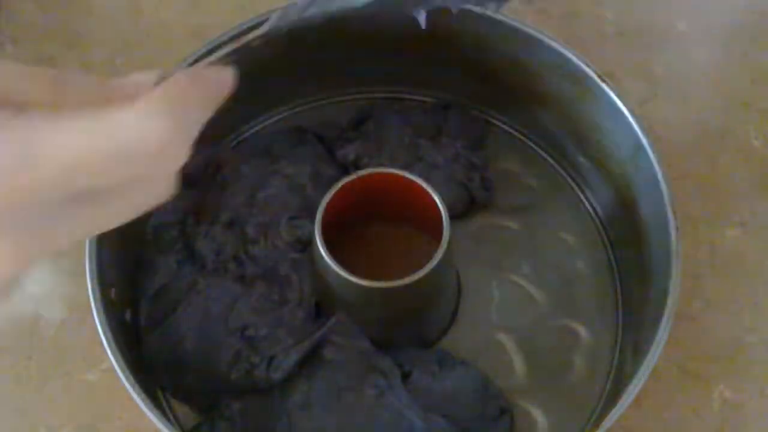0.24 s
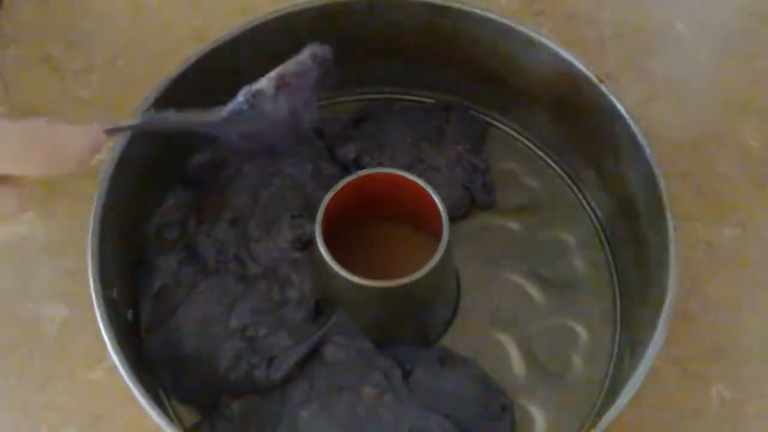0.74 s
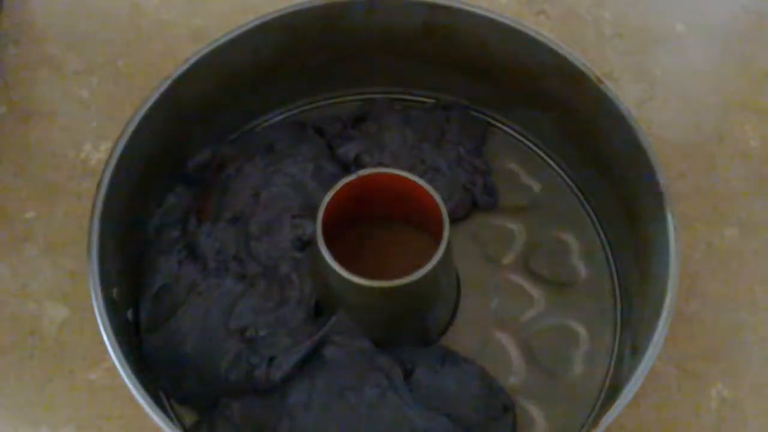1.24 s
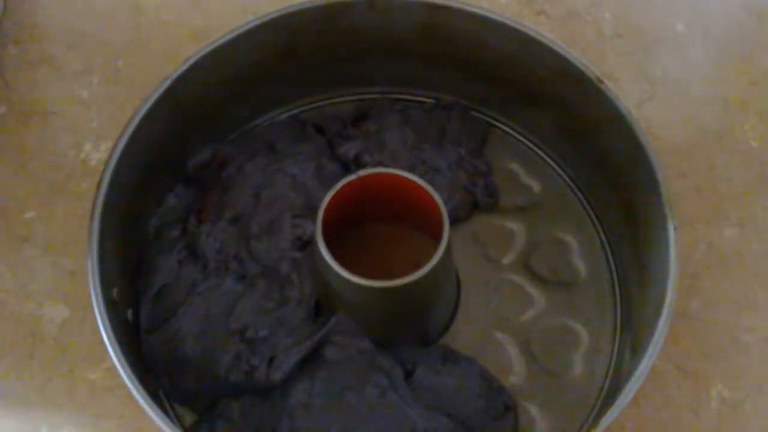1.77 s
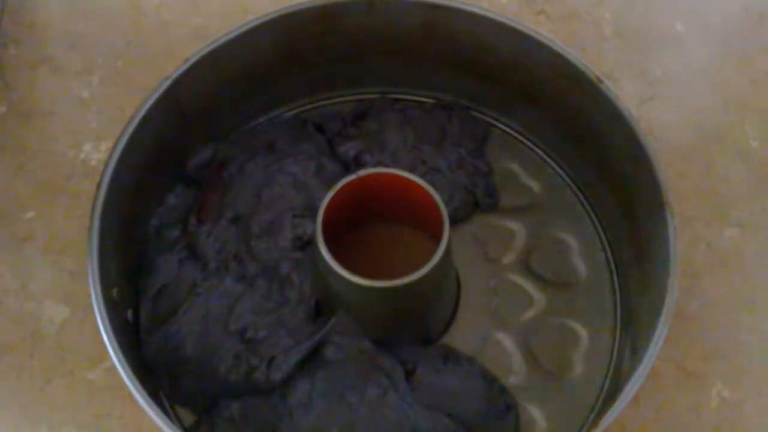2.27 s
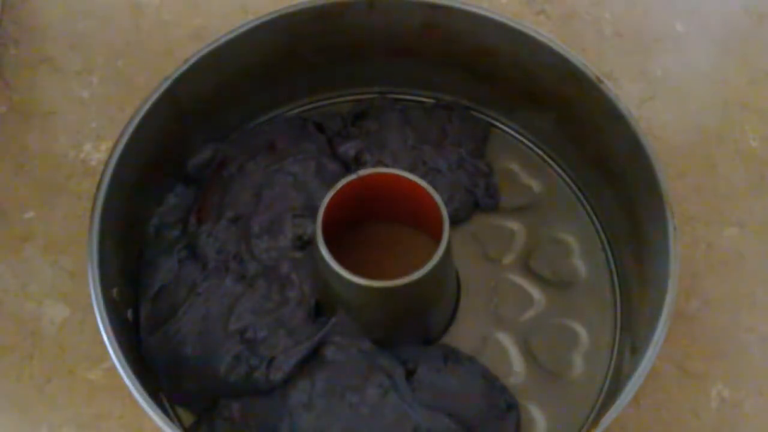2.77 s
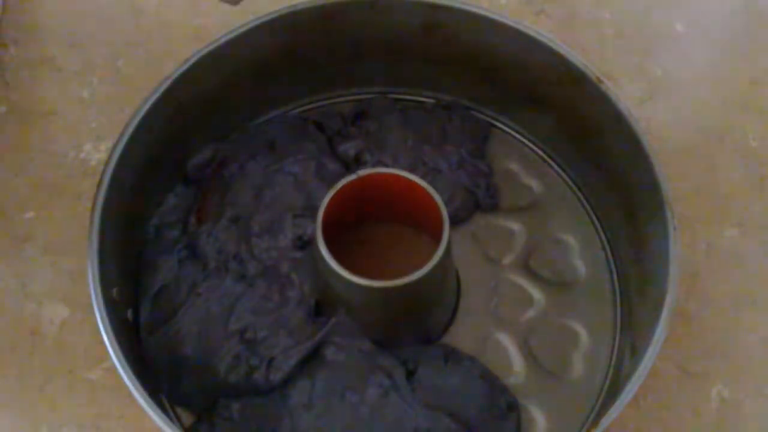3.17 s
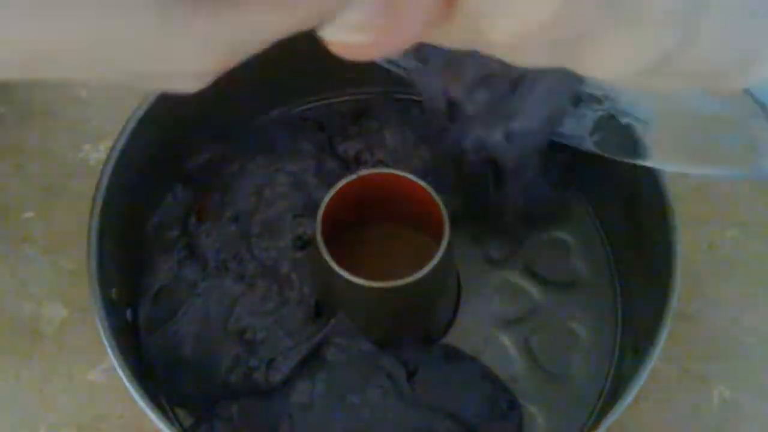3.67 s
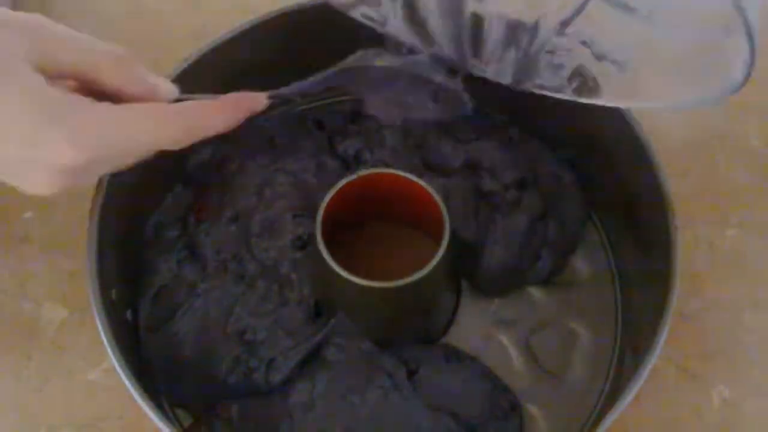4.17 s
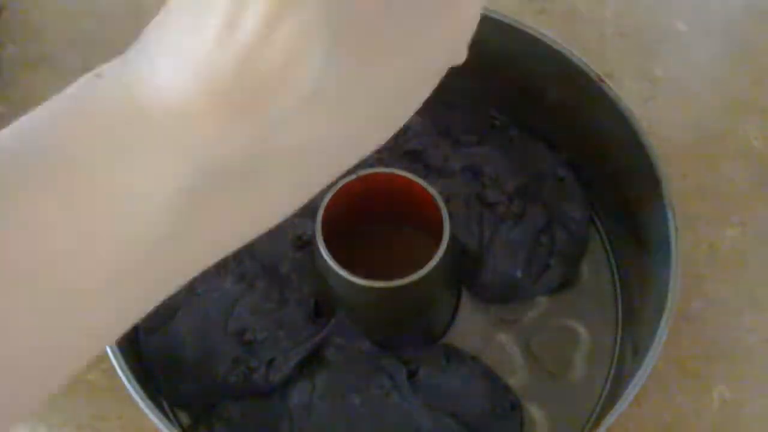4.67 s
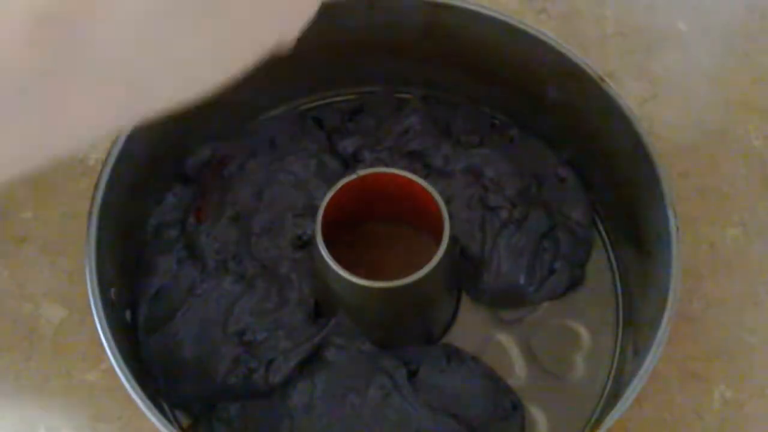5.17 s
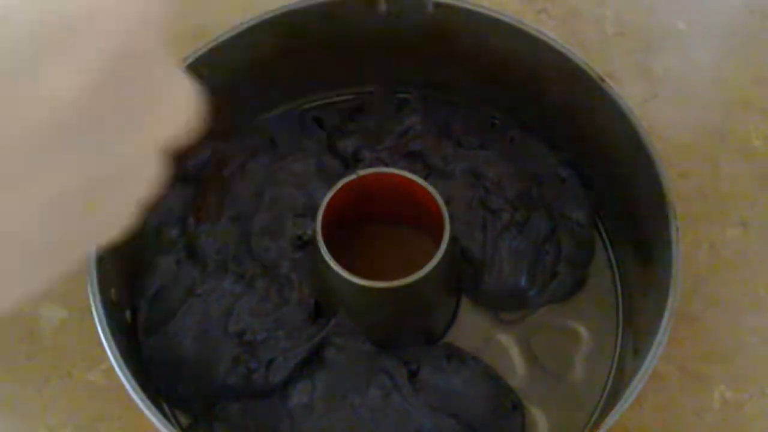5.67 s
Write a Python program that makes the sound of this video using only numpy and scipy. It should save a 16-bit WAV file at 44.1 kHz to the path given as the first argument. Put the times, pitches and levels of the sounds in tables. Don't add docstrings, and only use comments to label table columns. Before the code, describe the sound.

A quiet kitchen heard close up in stereo: low airy rumble, soft hiss, a distant fridge hum around 250 Hz and a faint fan whine that swells and slides. Around 0.3-0.7 s there are tiny sticky scrapes, then a dull metallic knock of bowl against pan at about 0.9 s. From 1.1 to 2.2 s a spoon taps the glass bowl in separate bright ticks, each with a very short, batter-damped ring. From 2.4 to 3.2 s the taps become a dense, uneven rattle with flat slaps and low puffs on the microphone. Between 3.4 and 3.9 s thick batter plops into the pan with soft thumps and slight wet texture. Two quick clinks sound at 4.0 s, a faint plop near 4.6 s. Firm, sharp taps return from 4.7 to 5.5 s, easing to a light last touch; a barely audible smear and background hum remain until about 5.9 s.

```python
import sys
import numpy as np
from scipy import signal
from scipy.fft import rfft, irfft
from scipy.io import wavfile
from scipy.ndimage import uniform_filter1d

SR = 44100
rng = np.random.default_rng(int(sys.argv[2]) if len(sys.argv) > 2 else 0)


def master(y):
    cut = np.clip(np.atleast_2d(y).T, -1, 1)
    pcm = np.round(cut * 32767)
    wavfile.write(sys.argv[1], SR, pcm.astype(np.int16))


def gain_from_decibels(decibels):
    exponent = np.asarray(decibels, float) / 20
    return 10 ** exponent


N = 261072

# start_s, level_db, edge_db (spoon sharpness), weight_db (of the blow),
# extra_db (upper ring)
RIM_TAPS = [
    (1.0816, -65, 21, 5.5, 5.5),
    (1.2224, -44.5, 34, -5, 1),
    (1.3782, -38, 33.5, -3.5, 3),
    (1.5121, -41, 45.5, -6, 1.5),
    (1.5453, -62, 33, -0.5, 0.5),
    (1.6384, -39, 29.5, -4, 4.5),
    (1.8222, -42.5, 26.5, -5.5, -1.5),
    (1.9821, -49.5, 23.5, -5, -7),
    (2.2386, -53.5, 35, -3, 0.5),
]
WALL_TAPS = [(2.4183, -38, 25, -8, 3.5), (2.6095, -57, 16, -4.5, 2), (2.835, -74, 35, -8, -2.5),
             (2.937, -56.5, 10, -4, -6), (2.5649, -36, 25.7, -9.5, -0.5), (2.5902, -54.5, 3.2, -8, 15),
             (2.5962, -46, 13, -10, 6), (2.6184, -31.5, 17, -13, 2), (2.6787, -36, 21.4, -10.5, -4.5),
             (2.7507, -42.5, 5.8, -5, -1.5), (2.8128, -44.5, 14, -3, -10), (2.8963, -51, 30, -0.5, 3.5),
             (2.9263, -37.5, 24.2, -8, -3.8), (2.9469, -42.5, 26, -4.5, 10),
             (2.9804, -37.5, 24, -6.5, -3.5), (2.9921, -41.5, 11, -5, 4.5), (2.9986, -48.5, 31, -8.5, 5),
             (3.0324, -37, 24.3, -7.5, -7), (3.0457, -44.5, 29, -7, 2.5), (3.0907, -38, 20.3, -7, -0.5),
             (3.1194, -59.5, 26, 0, 6), (3.2085, -40, 34, -5.5, -10.5)]
LIP_TAPS = [
    (3.9749, -41, 28.4, -0.69, -4),
    (4.0406, -41.5, 27, -1.8, 0),
]
BASE_TAPS = [
    (4.7133, -35, 23.5, -10, -0.5),
    (4.7556, -51.5, 21, -11, 11),
    (4.7778, -72, 27, -1, 4),
    (4.9081, -33.5, 30, -11.5, -7),
    (4.9985, -34, 32.24, -9, -6.5),
    (5.4627, -55.5, 26, -0.5, 8.5),
]
FLAT_TAPS = [
    (2.7066, -40, 23, -5, 9),
    (2.8417, -45, 26.8, -6, 9.5),
    (2.8714, -37, 22, -7.5, -3),
    (3.1531, -38.5, 29.3, -9.5, -5),
    (3.178, -43, 28, -4.5, 4.5),
    (4.9507, -39, 26, -10.5, -6.5),
    (5.0601, -39, 31, -9.5, -15),
    (5.1258, -39.5, 28.5, -8, -3.5),
    (5.2354, -41.5, 27.7, -2, 0.5),
    (5.3505, -39, 30.5, -5.5, -1.5),
]
SMEARS = [(0.343, -62, 20, -1, .1), (2.322, -88.5, 42, -26, 9.5), (0.561, -56.5, 33, -9.5, .1),
          (0.5781, -59, 36, -8, .1), (0.5864, -63, 36, -10, .1), (0.6487, -57.5, 33, -14, .1),
          (0.659, -71, 33, -11, .1), (0.6684, -65, 37, -9, .1), (0.678, -67, 30, -13, .1),
          (0.591, -68, 33, -4, .1), (0.703, -68, 32, -5, .1), (0.6905, -55.5, 30, -25, .1),
          (0.6964, -56, 4.6, -8, .1), (3.3771, -70.5, 35, -2, .1), (3.3831, -59, 25, 0.5, 0.15),
          (3.8622, -76, 24, 3, 3.1), (4.1695, -88, 45, -12.5, 9.2), (4.1918, -84, 44, -13, 0.089),
          (4.2018, -65, 29.4, -5, 3), (5.6446, -72, 40.5, -4.5, 0.12)]
# start_s, thump_db, metal_db (ring relative to thump),
# splash_db (wet splash relative to ring)
KNOCKS = [(0.628, -48.5, -39, -4), (0.645, -49.5, -30, 9), (0.735, -55.5, -38, 2), (0.805, -81, -25, -4),
          (0.835, -77, -24, 3), (0.88, -57, -37, -3), (0.904, -34, -16.5, 2), (0.9105, -28.5, -22.5, -3),
          (0.917, -31.5, -36, -8), (0.923, -40, -20, -7), (0.97, -33, -13, -8), (1.032, -77, -7, -2)]
PLOPS = [(3.466, -45, -15.5, -13.5), (3.662, -52, -11.5, -4.5), (3.7185, -46, -9, -6.5),
         (3.742, -56, -37, -2), (3.7784, -41.5, -12, -8.5), (3.8, -75, 3, 1), (3.8321, -40.5, -17, -16),
         (3.844, -56, -16, 9.5), (3.76, -47.5, -36, -6), (3.9017, -41.5, -17.5, -13.5),
         (4.577, -58.5, -16, -11)]
# start_s, level_db, length_s, left_right_db
PUFFS = [(1.512, -45, 0.0067, 21), (2.678, -33.5, 0.0014, -4.5), (2.707, -45.5, 0.011, 19),
         (2.814, -26.5, 0.0016, 2), (2.946, -38, 0.0015, 7), (2.979, -33, 0.0019, 2),
         (3.031, -44, 0.0052, 10), (3.09, -37.5, 0.0023, 4), (3.137, -41, 0.0031, 4),
         (3.207, -39.5, 0.013, 21), (4.038, -33.5, 0.0059, 34.5), (4.713, -35, 0.0052, 28),
         (4.908, -35, 0.0068, 28), (4.999, -35, 0.009, 39.5), (5.132, -53, 0.0054, 45),
         (5.237, -51, 0.009, 12.5), (5.357, -45, 0.0043, 17), (5.479, -50.5, 0.0057, 6),
         (3.548, -46.5, 0.0048, 4.5), (3.651, -49.5, 0.0068, 2), (3.7784, -50, 0.0075, 3),
         (3.831, -48, 0.0044, 1), (3.9004, -38, 0.003, 4)]

# pitch_hz, level_db, t60_s
RIM_MODES = [(1768, -8.5, .035), (1882, -9, 0.044), (3200, -13, 0.026), (3400, -10.5, 0.08),
             (3690, -2, 0.049), (4810, -6.5, 0.032), (5640, -10, 0.032), (7280, -3.5, 0.053),
             (7900, -2, .04), (9500, -10, .035), (11220, -8.5, 0.016), (13860, -1, .045), (14400, -6, .03),
             (14700, -7, .03)]
WALL_MODES = [(1836, -10.5, 0.051), (2500, -11, 0.02), (2930, -12.5, .035), (3130, -10.5, 0.029),
              (3430, -4, .045), (3575, -4, 0.064), (3780, -3.5, .04), (4250, -11, 0.062),
              (4700, -4.5, 0.035), (7300, -11.5, .025), (11050, -5, .03), (12470, -8, .03),
              (13550, -1.5, 0.052), (15390, -4, .03)]
LIP_MODES = [(1820, -4.5, 0.063), (3120, -8.5, .04), (3830, -6.5, 0.15), (4740, -12.5, 0.057),
             (6500, -12.5, .04), (8300, -12.5, .04), (9200, -14, 0.037), (10950, -14, .03),
             (12170, -8, .03), (13500, -2, .04), (14000, 3.5, .03)]
BASE_MODES = [(1790, -14, .045), (2510, -19, .04), (3120, -14, .045), (3460, -7, .05), (3600, -10, .05),
              (3760, -12, .045), (4770, -16, .04), (7000, -20, .04), (11000, -15, .05), (12080, -16, .03),
              (12700, -17, .04), (13500, -14, .035), (14150, 2, .09), (14480, -7, .07)]
FLAT_MODES = [(1797, -8.5, 0.054), (2480, -18, 0.032), (3110, -4.5, 0.027), (3350, -2, 0.059),
              (3590, -9, 0.099), (4400, -14.5, 0.12), (4770, -6.5, .04), (7660, -11, 0.072),
              (10900, -8.5, 0.016), (11540, 0, 0.015), (11830, -1.5, .02), (13300, -6, .025),
              (15400, -3, .05), (15700, -9.5, .03)]
SMEAR_MODES = [(1850, -12, .03), (2600, -12, .03), (3700, -6, .035), (4300, -6, .03), (5000, -6, .03),
               (7500, -12, .03), (9200, -10, .03), (12000, -6, .03), (13300, -2, .035), (14000, 0, .04)]
PAN_MODES = [(268, -0.5, 0.14), (388, -10, 0.078), (609, -9, 0.14), (715, 1.5, 0.07), (844, -6.5, 0.046),
             (1087, -5, 0.028), (1395, -12, 0.031), (1744, -9, 0.034), (1847, -8, 0.029),
             (2290, -12.5, 0.04), (2520, -20, 0.09), (3010, -22.5, 0.089), (3305, -11, 0.06),
             (3920, -15, 0.04)]
# pitch_hz, level_db, t60_s
CAVITY_MODES = [(722, -20, .05), (1030, -14, .05)]
# pitch_hz, width_hz, share_removed
HOLLOWS = [(1225, 190, 0.59), (2225, 250, 0.4), (2900, 170, .5), (4430, 180, 0.39), (5580, 170, 0.27)]
# low_hz, high_hz
GLASS_BANDS = [(380, 1120), (1380, 2300), (2400, 5100), (6500, 9500), (10200, 15800)]
PAN_BANDS = [(235, 1200), (1200, 2650), (2800, 5500), (5500, 16300)]
GLASS_LEAN = [-0.5, -1.5, -1, 3, -1.5]
# bass_lag_s, treble_lag_s (added), reached_hz
PORT_LAG = (45e-6, 54e-6, 14300)

# time_s, level_db
FRIDGE = [
    (0.0, -71.5),
    (0.64, -62.5),
    (0.9, -68.5),
    (1.35, -64),
    (1.8, -69),
    (2.0, -65.5),
    (3.28, -65.5),
    (3.58, -61.5),
    (3.96, -65),
    (5.92, -64.5),
]
# start_s, length_s, first_hz, last_hz, level_db
WHINE = [
    (0.081, 0.74, 350, 317, -72),
    (1.047, 0.34, 318, 310, -71),
    (1.798, 0.55, 316, 305.4, -74),
    (2.783, 0.32, 297, 351, -62),
    (3.06, 0.26, 372, 344, -68.5),
    (3.709, 0.52, 332, 382, -68.5),
    (3.849, 1.4, 323, 314, -67.5),
    (5.239, 0.16, 362, 351, -71.5),
    (5.588, 0.37, 352, 360, -64.5),
    (5.575, 0.29, 312, 331, -64),
]
# pitch_hz, level_db (per Hz)
ROOM_SPECTRUM = [(15, -34.5), (25, -1), (162, -13.5), (243, -9.5), (294, -8.5), (346, -12), (407, -20.5),
                 (739, -21.5), (823, -25.5), (1490, -35), (2120, -48.5), (2640, -56), (3750, -43),
                 (14900, -35), (16200, -35)]
# pitch_hz, likeness (clipped to 0 to 1 when read)
ROOM_LIKENESS = [(60, 0.3), (150, 0.62), (380, 0.7), (950, 0.5), (2380, 0.9), (5980, -5.5), (15000, 1)]
# pitch_hz, lean_db
ROOM_LEAN = [(60, 0.5), (240, 3), (950, 0), (3770, 3.5), (15000, -8.5)]

CHOKE_HZ = 9500


def evened(x):
    return x / np.sqrt(np.mean(x ** 2) + 1e-20)


def read(points, hz):
    f, value = np.transpose(points)
    return np.interp(np.log(hz + 1), np.log(f + 1), value)


def add(mix, s, sound):
    part = mix[:, round(s * SR):][:, :sound.shape[1]]
    part += sound[:, :part.shape[1]]


def panned(x, left_right_db):
    return x * gain_from_decibels([[left_right_db / 2], [-left_right_db / 2]])


def vibrations(modes, t):
    hz, db, t60 = np.transpose(modes * 3)[:, :, None]
    shade, phase, detune = rng.standard_normal((3, len(hz), 1))
    high = hz > 5300
    loose = np.where(hz < 5300, 0.55, 1)
    shade, phase = shade * loose, phase * loose
    partner = np.arange(len(hz))[:, None] >= len(modes)
    detune = detune * loose * (partner + loose / 4 + 5 * high * (hz < CHOKE_HZ))
    level_db = db - 4 * partner + 2.5 * shade
    waves = gain_from_decibels(level_db) * np.sin(2 * np.pi * hz * (1 + 0.007 * detune) * t + 0.6 * phase)
    flutter = uniform_filter1d(rng.standard_normal((3, 1, len(t))), size=90)
    wobble = 1 + 4.0 * flutter * np.clip(t / 0.003, 0, 1)
    waves = (waves.reshape(3, -1, len(t)) * wobble).reshape(waves.shape)
    middle = (hz > 2300) * (hz < CHOKE_HZ)
    waves = waves * gain_from_decibels(-4.5 * middle * np.clip(t / 0.0029, 0, 1))
    facing_db = 2 * (shade[::-1] * (hz > 5120)).T
    return waves, hz, t60, facing_db


def ports(x):
    hz = np.fft.rfftfreq(x.shape[1], 1 / SR)
    bass_lag_s, treble_lag_s, reached_hz = PORT_LAG
    lag = bass_lag_s + treble_lag_s * (hz / reached_hz) ** 3
    late_right = irfft(rfft(x[1]) * np.exp(-2j * np.pi * hz * lag), x.shape[1])
    return np.array([x[0], late_right])


def contact(modes, tick_s, ring_db, scatter_db, scatter_t60, rise_s, apart, colour):
    t = np.arange(2400) / SR
    hard = rise_s < 0.0002
    rise = np.clip(t / rise_s, 0, 1)
    waves, hz, t60, facing_db = vibrations(modes, t)
    choke_db = 9.5 * (hz > CHOKE_HZ) * np.clip(t / 0.016, 0, 1)
    ring = gain_from_decibels(np.vstack([facing_db, -facing_db]) / 2) @ (waves * gain_from_decibels(-60 * t / t60 - choke_db))
    swing = np.sin(2 * np.pi * 3710 * t) * np.exp(-t / 0.0003)
    ring = ring - 0.77 * np.max(abs(ring)) * swing * hard
    brief = (waves[:, :300] * gain_from_decibels(-60 * t[:300] / 0.005)).sum(0)
    brief = brief / np.linalg.norm(brief)

    shared, left, right = rng.standard_normal((3, len(t)))
    noise = shared + apart * np.gradient([left, right], axis=1)
    click = 2.53 * (t == 3 / SR) * hard
    tick = noise * np.exp(-t / tick_s) + click
    scatter = noise * gain_from_decibels(scatter_db - 60 * t / scatter_t60) * np.clip(t / 0.0035, 0, 1)
    rub = (tick + scatter) * rise
    rub = rub + colour * signal.fftconvolve(rub, brief[None], axes=1)[:, :len(t)]
    rub = rub + 0.87 * shared * np.exp(-t / 0.00005) * hard

    punch = 1 + 1.6 * np.exp(-(t / 0.0006) ** 2) * hard
    gate = np.clip((0.052 - t) / 0.022, 0, 1) * punch
    return ports((rub + gain_from_decibels(ring_db) * ring / np.max(abs(ring)) * rise) * gate)


def hollowed(x):
    for hz, width_hz, share in HOLLOWS:
        x = x - np.clip(share, 0, 1) * signal.lfilter(*signal.iirpeak(hz, hz / width_hz, SR), x)
    return x


def banded(raw, bands_hz, levels_db, leans_db):
    out = np.zeros_like(raw)
    for band_hz, db, lean_db in zip(bands_hz, levels_db, leans_db):
        band = signal.butter(N=3, Wn=band_hz, btype="band", fs=SR, output="sos")
        part = signal.sosfilt(band, raw)
        early_rms = np.sqrt(np.mean(part.mean(0)[:600] ** 2))
        out += gain_from_decibels(db) * panned(part, lean_db) / early_rms
    return out


def glass(rows, modes, bass_db, crest_db, upper_db, upper_share, pan_db, **blow):
    out = np.zeros((2, N))
    for s, db, edge_db, weight_db, extra_db in rows:
        upper = upper_db + extra_db + upper_share * (edge_db - 24)
        levels_db = db + np.array([weight_db + bass_db, weight_db, 0, upper, edge_db - crest_db])
        add(out, s, banded(hollowed(contact(modes, **blow)), GLASS_BANDS, levels_db, GLASS_LEAN))
    return panned(out, pan_db)


def pan(rows, crest_db, fizz_db, pan_db, **blow):
    out = np.zeros((2, N))
    for s, db, metal_db, splash_db in rows:
        wet_db = metal_db + splash_db
        levels_db = db + np.array([-crest_db, metal_db, wet_db, wet_db + fizz_db])
        add(out, s, banded(contact(PAN_MODES, **blow), PAN_BANDS, levels_db, np.zeros(4)))
    return panned(out, pan_db)


def puffs():
    out = np.zeros((2, N))
    for s, db, length, left_right_db in PUFFS:
        t = np.arange(3000) / SR
        u = t / length
        push = uniform_filter1d(-np.sin(5.5 * u ** 0.54) * np.exp(-1.2 * u), size=60)
        push = push * np.clip(t / 0.0017, 0, 1) ** 2
        add(out, s, gain_from_decibels(db + 7.0) * push * gain_from_decibels([[0], [-left_right_db]]))
    return out


def resonate(x, hz, width_hz):
    turn = np.exp(2j * np.pi * np.cumsum(hz * np.ones(x.shape[-1])) / SR)
    r = np.exp(-np.pi * width_hz / SR)
    return 2 * (turn * signal.lfilter([1 - r], [1, -r], x / turn)).real


def fridge():
    hum_hz, overtone_hz, duct_hz = 246.5, 708, 1023
    t = np.arange(N) / SR
    fuzz = rng.standard_normal((3, N))
    hum_fuzz = evened(resonate(resonate(fuzz[0], hum_hz, 8.3), hum_hz, 25))
    hum = np.sin(2 * np.pi * hum_hz * t) + 0.13 * hum_fuzz
    overtone = evened(resonate(resonate(fuzz[1], overtone_hz, 11), overtone_hz, 45))
    duct = evened(resonate(resonate(fuzz[2], duct_hz, 70), duct_hz, 97))
    hum_db = np.interp(t, *np.transpose(FRIDGE))
    return gain_from_decibels(hum_db) * (evened(hum) + gain_from_decibels(-17) * overtone + gain_from_decibels(-18) * duct)


def whine():
    out = np.zeros((1, N))
    fuzz = rng.standard_normal((len(WHINE), 2 * SR))
    for (s, length, first_hz, last_hz, db), noise in zip(WHINE, fuzz):
        t = np.arange(0, length, 1 / SR)
        hz = first_hz + (last_hz - first_hz) * t / length
        edge = evened(resonate(resonate(noise[:len(t)], hz, 29), hz, 26))
        tone = np.sin(2 * np.pi * np.cumsum(hz) / SR) + 0.58 * edge
        fade = np.clip(np.minimum(t, length - t) / 0.03, 0, 1)
        add(out, s, gain_from_decibels(db) * (tone * fade)[None])
    return out


def room(clatter):
    frames = N // 256 + 5
    hz = np.fft.rfftfreq(1024, 1 / SR)
    a, b, c, d, patches = rng.standard_normal((frames, 513, 5)).T
    patches = evened(uniform_filter1d(uniform_filter1d(patches, 10, 0), 6, 1))
    t = (np.arange(frames) - 2) * 256 / SR
    bin_hz = hz[:, None]

    power = uniform_filter1d((clatter ** 2).mean(0), round(0.16 * SR))
    over_db = np.maximum(10 * np.log10(abs(power) + 1e-12) + 39.5, 0)
    busy_db = np.interp(t, np.arange(N) / SR, over_db)
    air_db = 4.5 - 4 * np.exp(-t / 0.3) + 0.28 * busy_db
    hiss_db = 6 - 0.034 * busy_db
    rumble_db = 0.19 * busy_db * (bin_hz < 262.9)
    is_hiss = np.clip((bin_hz - 1500) / 1500, 0, 1)
    level_db = (1 - is_hiss) * air_db + is_hiss * hiss_db + rumble_db

    same = np.clip(read(ROOM_LIKENESS, hz), 0, 1)[:, None]
    left = a + 1j * b
    z = np.array([left, same * left + np.sqrt(1 - same ** 2) * (c + 1j * d)])
    lean_db = read(ROOM_LEAN, hz)[:, None] * np.array([0.5, -0.5])[:, None, None]
    shape = gain_from_decibels(read(ROOM_SPECTRUM, hz)[:, None] + 1.6 * patches + lean_db) * (bin_hz < 16000)
    noise = signal.istft(z * shape * gain_from_decibels(level_db), nperseg=1024, noverlap=768)[1][:, :N]
    return gain_from_decibels(-63) * noise / np.sqrt(np.sum(shape ** 2) / frames)


def scene():
    rim = glass(RIM_TAPS, RIM_MODES + CAVITY_MODES, bass_db=-11.0, crest_db=33.0, upper_db=-10.0,
                upper_share=0.54, pan_db=1.5, tick_s=0.0003, ring_db=6.5, scatter_db=-11.5,
                scatter_t60=0.06, rise_s=0.00004, apart=0.99, colour=0.7)
    wall = glass(WALL_TAPS, WALL_MODES + CAVITY_MODES, bass_db=-6.0, crest_db=23.5, upper_db=-9.5,
                 upper_share=0.1, pan_db=2.4, tick_s=0.00038, ring_db=3.5, scatter_db=-11.0,
                 scatter_t60=0.056, rise_s=0.00004, apart=0.65, colour=0.063)
    lip = glass(LIP_TAPS, LIP_MODES + CAVITY_MODES, bass_db=-13.0, crest_db=26.1, upper_db=0.32,
                upper_share=0.059, pan_db=1.5, tick_s=0.00014, ring_db=-5.5, scatter_db=-14.5,
                scatter_t60=0.075, rise_s=0.00004, apart=0.63, colour=0.14)
    base = glass(BASE_TAPS, BASE_MODES + CAVITY_MODES, bass_db=-10.0, crest_db=25.7, upper_db=-13.5,
                 upper_share=0.2, pan_db=1.3, tick_s=0.00011, ring_db=4.0, scatter_db=-13.5,
                 scatter_t60=0.066, rise_s=0.00004, apart=1.0, colour=0.71)
    flat = glass(FLAT_TAPS, FLAT_MODES + CAVITY_MODES, bass_db=-7.5, crest_db=25.0, upper_db=-9.5,
                 upper_share=0.19, pan_db=1.5, tick_s=0.0004, ring_db=5.0, scatter_db=-14.0,
                 scatter_t60=0.064, rise_s=0.00004, apart=1.0, colour=0.37)
    smears = glass(SMEARS, SMEAR_MODES, bass_db=-2.5, crest_db=31.4, upper_db=-3.0,
                   upper_share=0.11, pan_db=0.97, tick_s=0.0031, ring_db=17.5, scatter_db=-6.0,
                   scatter_t60=0.05, rise_s=0.00068, apart=0.91, colour=0.59)
    knocks = pan(KNOCKS, crest_db=10.6, fizz_db=-8, pan_db=-1.1, tick_s=0.0024, ring_db=21.0,
                 scatter_db=7.0, scatter_t60=0.072, rise_s=0.0022, apart=1.0, colour=1.0)
    plops = pan(PLOPS, crest_db=9.9, fizz_db=-0.26, pan_db=2.1, tick_s=0.0031, ring_db=-7.0,
                scatter_db=-12.0, scatter_t60=0.069, rise_s=0.000064, apart=1.0, colour=0.77)
    clatter = rim + wall + lip + base + flat + smears + knocks + plops
    return clatter + puffs() + room(clatter) + fridge() + whine()


def roll_off(x):
    return signal.sosfilt(signal.butter(12, 17160, fs=SR, output="sos"), x)


def record(dry):
    level_db = 10 * np.log10(abs(uniform_filter1d((dry ** 2).mean(0), size=200)) + 1e-12)
    late_db = uniform_filter1d(level_db, size=1800, origin=850)
    duck_db = np.clip(0.22 * (late_db - level_db - 11.5), 0, 20)
    dull = signal.sosfilt(signal.butter(N=2, Wn=1400, fs=SR, output="sos"), dry)
    gated = dull + (dry - dull) * gain_from_decibels(-duck_db)
    ceiling = 0.95
    limited = ceiling * np.tanh(gated / ceiling)
    return roll_off(limited)


dry = scene()
out = record(dry)
master(out)
```